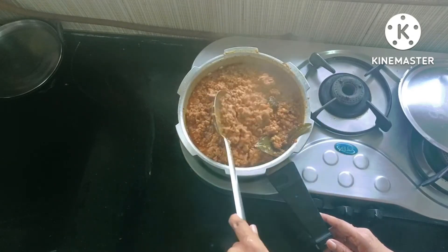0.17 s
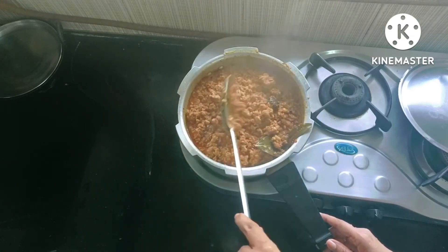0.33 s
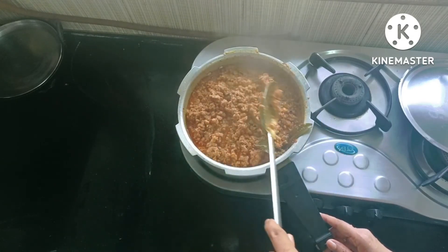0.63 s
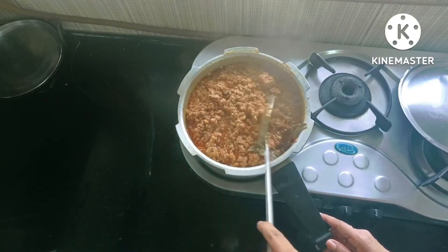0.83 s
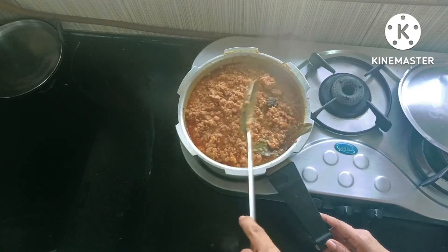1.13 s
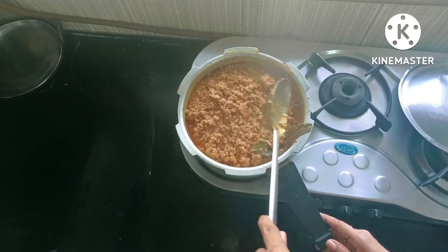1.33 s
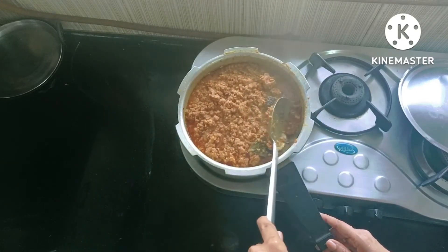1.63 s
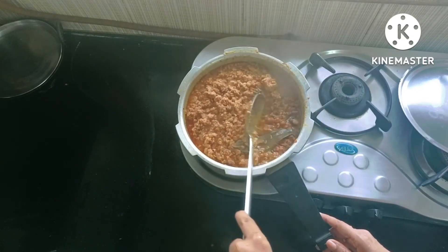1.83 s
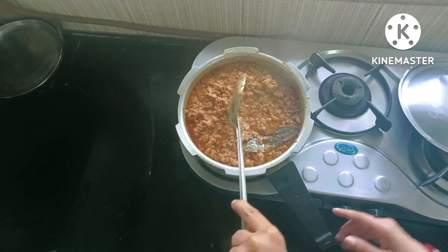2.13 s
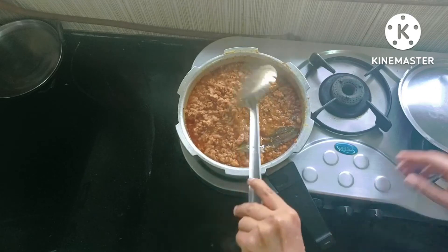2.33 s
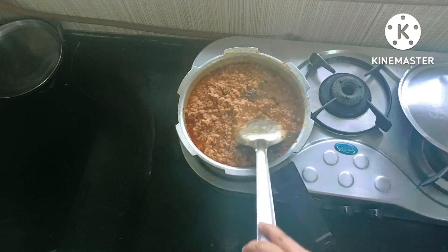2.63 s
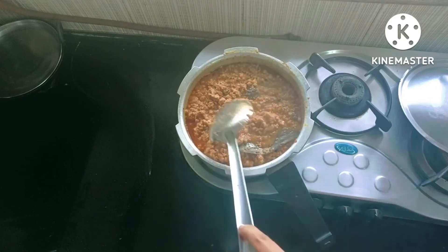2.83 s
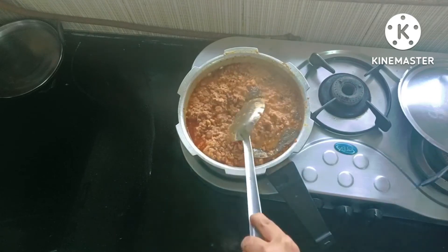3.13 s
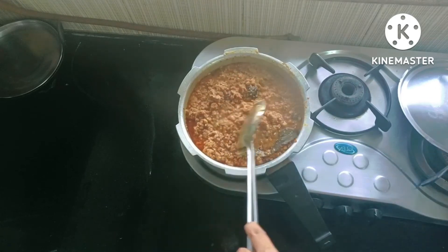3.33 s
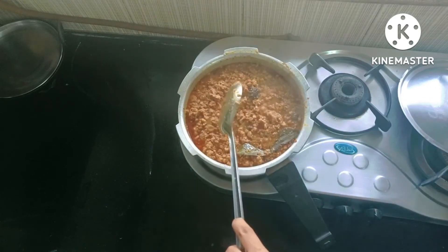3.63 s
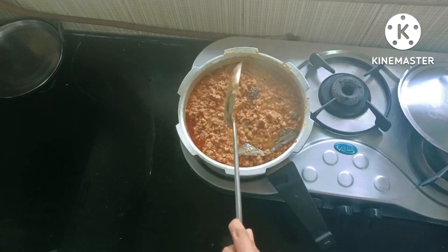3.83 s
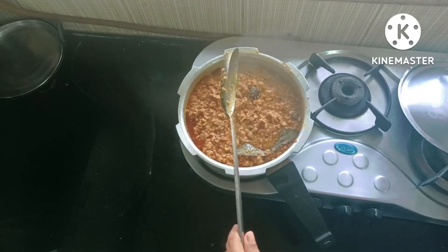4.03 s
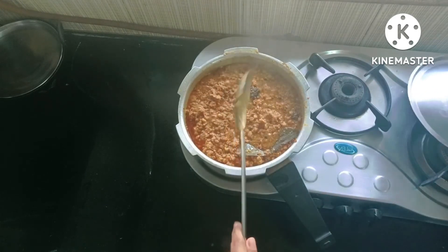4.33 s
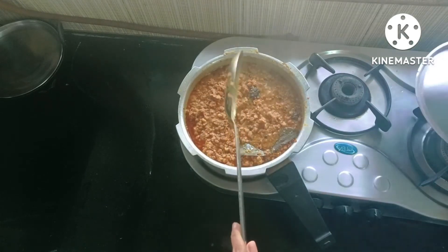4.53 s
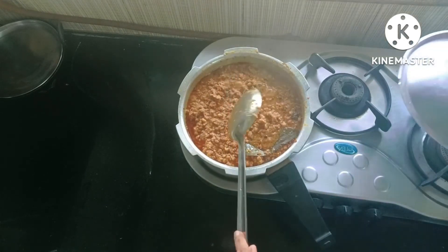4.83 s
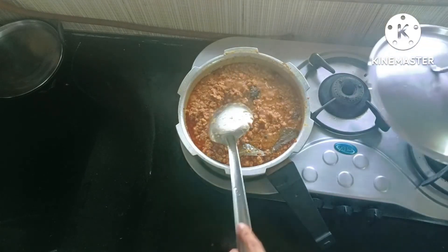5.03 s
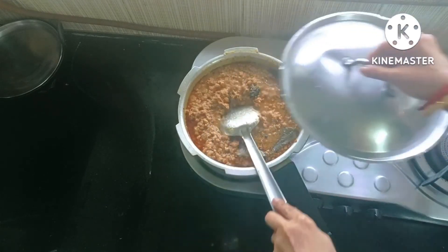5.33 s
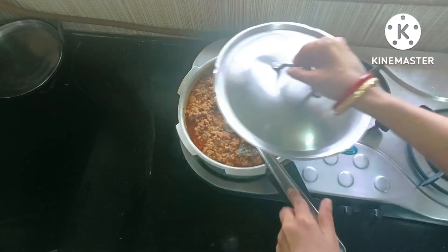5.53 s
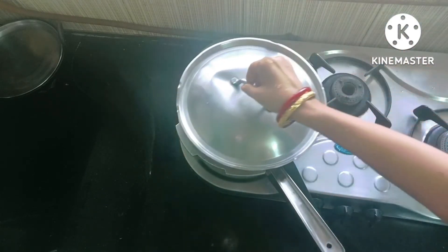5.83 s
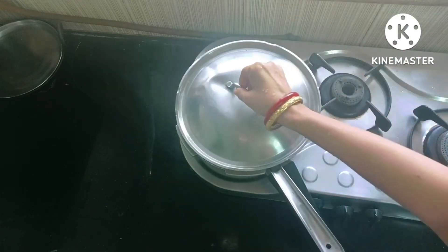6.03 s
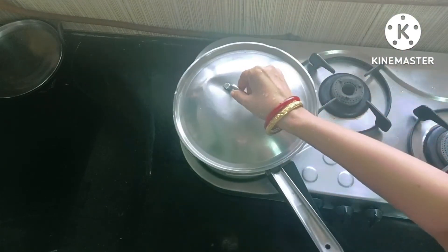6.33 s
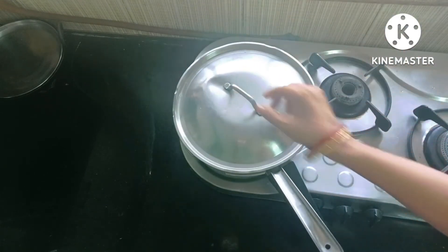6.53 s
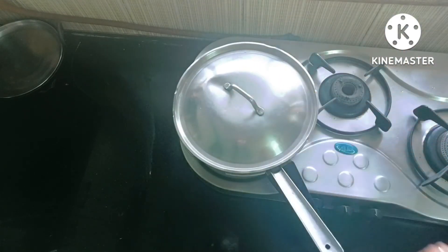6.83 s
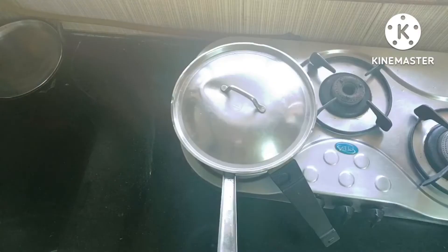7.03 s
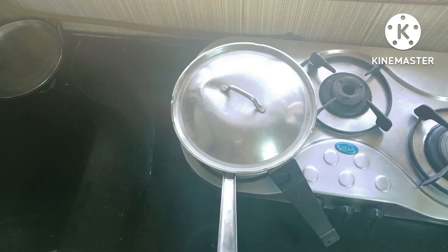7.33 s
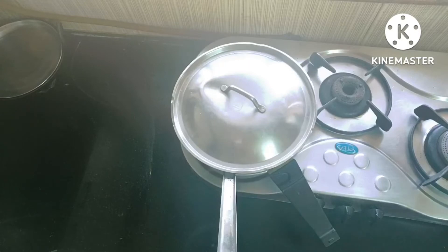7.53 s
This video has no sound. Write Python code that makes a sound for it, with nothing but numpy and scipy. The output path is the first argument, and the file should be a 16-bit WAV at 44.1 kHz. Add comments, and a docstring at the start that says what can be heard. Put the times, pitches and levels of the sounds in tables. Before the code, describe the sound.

A stereo microphone near the stove picks up quiet room air, low uneven rumble and fine sizzling. Wet pops come from a steel pot, slightly to the right, as a ladle scrapes, squeals and ticks on its wall. A heavy metallic lid clatter dominates around six seconds, its ring dying quickly in the small hard room. The sound drops out briefly just after seven, then hiss and dull bubbling return stronger.

```python
"""Minced meat simmers in a steel pot as random grains of wet crackle and squelch, with pitched plops.
Meanwhile a steel ladle ticks and squeals on the steel, knocks the pot and rustles through the meat.
Near six seconds a steel lid clonks onto the rim, ringing in decaying modes, and rattles into place.
At seven seconds the simmer starts to build up again under the lid; the sound then cuts out briefly.
A small hard kitchen answers with a noise tail, over room air, hiss and an unevenly rumbling stove."""
import sys
import numpy as np
from scipy import signal
from scipy.fft import rfft, irfft, next_fast_len
from scipy.io import wavfile
from scipy.ndimage import map_coordinates

SR = 44100
rng = np.random.default_rng(int(sys.argv[2]) if len(sys.argv) > 2 else 0)


def pcm_store(signal):
    """Save signal as 16-bit PCM."""
    levels = np.round(np.clip(np.atleast_2d(signal), -1, 1) * 32767)
    wavfile.write(sys.argv[1], SR, levels.astype(np.int16).T)


N = 338688
TOP_HZ = 15750  # band limit of the whole sound

# The lid's main blows on the rim. Each row: start in seconds, relative ring level in dB,
# relative bright clash level in dB, loss at each rebound in dB, how flat the lid lies (0-1).
LID_BLOWS = [(5.981, -20, -48, 6.5, 0), (6.047, -24.5, -48, 10.5, 0.25), (6.086, -25.5, -31.5, 10.5, 1),
             (6.103, -20.5, -33, 10, 1), (6.126, -22, -29.5, 4.5, 0.6), (6.187, -19.5, -36.5, 6, 0.99),
             (6.217, -23, -38, 3, 1)]
# Spectrum of wet squelching. Each row: frequency in Hz, relative level in dB.
SQUELCH_SPECTRUM = [(800, -7.5), (1500, -3), (2400, 2), (4500, -20), (9000, -30.5)]
# Spectrum of the ladle's dull, gritty contact. Each row: frequency in Hz, relative level in dB.
GRIT_SPECTRUM = [(1500, -23), (3100, -0.5), (7100, -4.5), (13000, -33.5)]


def amp(db):
    """Decibels to gain."""
    return np.exp(np.asarray(db) * (np.log(10) / 20))


def unit(x):
    """Scale to rms 1."""
    return x / np.sqrt(np.mean(x ** 2) + 1e-20)


def along(points, hz):
    """Read (Hz, value) points on a log frequency axis."""
    f, v = np.transpose(points)
    return np.interp(np.log(hz + 1), np.log(f + 1), v)


def curves(rows):
    """One value per sample for each column after the time; the end values hold."""
    s, *cols = np.transpose(rows)
    return [np.interp(np.arange(N) / SR, s, c) for c in cols]


def hold(t, s, length, attack, release):
    """A straight rise from s, a hold until s + length, a straight fall."""
    rise = np.clip((t - s) / attack, 0, 1)
    return rise * np.clip(1 - (t - s - length) / release, 0, 1)


def wobble(rate, size):
    """A smooth random curve, rate knots a second."""
    knots = rng.standard_normal(int(size * rate / SR) + 4)
    fine = np.arange(0, len(knots) - 1, .125)
    return np.interp(np.arange(size) * rate / SR, fine, map_coordinates(knots, [fine]))


def colour(x, spectrum):
    """Shape x by a spectrum in dB, at rms 1."""
    size = x.shape[-1]
    m = next_fast_len(size + 8192)
    gain = amp(along(spectrum, np.fft.rfftfreq(m, 1 / SR)))
    return unit(irfft(rfft(x, m) * gain, m)[..., :size])


def noise(spectrum, width, size):
    """Coloured stereo noise; width is side over mid."""
    mid, side = rng.standard_normal((2, size))
    return colour(np.array([mid + width * side, mid - width * side]), spectrum)


def highpass(x, hz):
    """Cut the lowest frequencies with a steep high-pass."""
    return signal.sosfilt(signal.butter(4, hz, 'highpass', fs=SR, output='sos'), x)


def pan(db):
    """Left and right gains for a level difference."""
    return amp([[db / 2], [-db / 2]])


def add(track, s, sound):
    """Mix a sound into a track at s seconds."""
    part = track[:, round(s * SR):][:, :sound.shape[-1]]
    part += sound[..., :part.shape[1]]


def ring(modes, t, scatter_db, spread, count=1):
    """Blows on a metal body: its modes decay from new strengths, each with its own phase per port."""
    hz, db, t60 = np.transpose(modes)
    level, phase, skew = rng.standard_normal((count, 3, 1, len(modes))).swapaxes(0, 1)
    angle = 2 * np.pi * phase + spread * skew * np.array([[1], [-1]])
    start = amp(db + scatter_db * level) * np.exp(1j * angle)
    step = amp(-60 / SR / t60) * np.exp(2j * np.pi * hz / SR)  # turn and fade per sample
    swing = np.cumprod(np.repeat(step[:, None], len(t), axis=1), axis=1)
    return np.imag(start.reshape(-1, len(modes)) @ swing).reshape(count, 2, -1)


def grains(rate, low_hz, high_hz, cycles, spike_db):
    """Tiny bursting bubbles, each with its own time, pitch and place; a few are much larger."""
    when, size, place, pitch = rng.random((int(rate * N / SR), 4)).T[:, :, None]
    hz = low_hz * (high_hz / low_hz) ** pitch
    k = np.arange(int(5 * cycles * SR / np.sqrt(low_hz * high_hz)))
    strength = amp(-spike_db * np.log(.01 + .99 * size))
    fade = np.exp(-hz * k / SR / cycles)
    wave = strength * np.sin(2 * np.pi * hz * k / SR) * fade
    at = ((when * N).astype(int) + k).ravel()
    sides = np.cos(place * np.pi / 2), np.sin(place * np.pi / 2)
    return np.array([np.bincount(at, (wave * g).ravel(), N)[:N] for g in sides])


def stirring():
    """Wet meat crackles and squelches all along; each ladle stroke adds a swelling, grainy rustle."""
    # The ladle dragging through the meat. Each row: start in seconds, length in seconds, level in dB.
    strokes = [(2.088, 0.084, -66), (3.121, 0.16, -56), (3.642, 0.28, -67.5), (4.834, 0.16, -66)]
    # Spectra of the fine crackle and of rustling meat. Each row: frequency in Hz, relative level in dB.
    crackle_spectrum = [(2000, -17.5), (3600, -3.5), (4400, -11), (7800, 6.5), (8800, -7), (10100, 7),
                        (12500, -11.5), (15700, -16)]
    rustle_spectrum = [(1500, -5.5), (9000, 4.5), (15700, -1.5)]
    crackle_db, squelch_db = -74, -78.5
    turning_db, turning_start_s, turning_end_s = 3.5, 1.8, 3.7  # more squelch as the ladle turns the meat
    covered_db = -6  # under the lid

    t = np.arange(N) / SR
    cover_db = covered_db * np.clip((t - LID_BLOWS[0][0]) / .3, 0, 1)
    turn_db = turning_db * hold(t, turning_start_s, turning_end_s - turning_start_s, 0.037, 1.0)
    drag = sum(amp(db) * hold(t, s, length * 3 / 4, length / 4, length / 4) for s, length, db in strokes)
    fine = colour(grains(260, low_hz=2800, high_hz=14000, cycles=3.5, spike_db=6), crackle_spectrum)
    rustle = colour(grains(1200, low_hz=2500, high_hz=15000, cycles=2, spike_db=4.5), rustle_spectrum)
    coarse = colour(grains(280, low_hz=600, high_hz=4000, cycles=6, spike_db=4.6), SQUELCH_SPECTRUM)
    crackle = amp(crackle_db + 3.8 * wobble(18, N)) * fine
    squelch = amp(squelch_db + turn_db + 5.6 * wobble(28, N)) * coarse
    return amp(cover_db) * (crackle + squelch) + amp(-2.5 + 4.2 * wobble(40, N)) * drag * rustle


def plops():
    """Bursting pockets ring for some cycles; bubbles under the lid ring the lid longer, fluttering."""
    # Larger wet pockets bursting. Each row: start in seconds, relative level in dB, pitch in Hz.
    pockets = [(0.018, -45.5, 2130), (0.919, -34.5, 2230), (1.4453, -34, 1940), (2.2748, -39.5, 2427),
               (3.539, -44.5, 1480), (3.6451, -31.5, 2280), (4.166, -35.5, 1546), (5.1066, -47, 1370)]
    # Bubbles under the closed lid. Each row: start in seconds, relative level in dB,
    # pitch in Hz, rise in seconds.
    muffled = [(6.49, -60.5, 494.6, 0.035), (6.68, -63.5, 1905, 0.026), (6.721, -59.5, 521, 0.019),
               (7.221, -48.5, 1398, 0.0064), (7.522, -54.5, 1410, 0.0053)]

    out, t = np.zeros((2, N)), np.arange(SR // 4) / SR
    for s, db, hz in pockets:
        tone = np.sin(2 * np.pi * hz * t) * amp(-60 * t / 0.02)
        spectrum = [(hz / 3, -45), (hz * 1.04, 0), (hz * 0.83, -2), (hz * 3, -45)]
        splash = noise(spectrum, 0.4, len(t)) * amp(-60 * t / 0.074)
        onset = 1 - np.exp(-t / 0.00047)
        add(out, s - .001, amp(db - 1.0) * (tone + 0.23 * splash) * onset)
    for s, db, hz, rise in muffled:
        pitch = hz * (1 + 0.017 * wobble(127, len(t)))
        tone = np.sin(2 * np.pi * np.cumsum(pitch) / SR)
        flutter = amp(3.4 * wobble(63, len(t)))
        swell = np.minimum(t / rise, 1) * amp(-60 * np.maximum(t - rise, 0) / 0.17)
        add(out, s, amp(db - 0.5) * tone * flutter * swell)
    return out


def build_up():
    """How far the covered simmer has built up, 0-1, on a straight rise."""
    start_s, rise_s = 6.916, 0.52
    return np.clip((np.arange(N) / SR - start_s) / rise_s, 0, 1)


def boiling():
    """Under the lid the simmer builds up again as a dull bubbling of low-pitched grains."""
    boil_db = -70.5
    return amp(boil_db) * build_up() * unit(grains(240, low_hz=405, high_hz=685, cycles=3.7, spike_db=4.5))


def ladle():
    """Bare steel on steel glints and rings, contact through meat is duller; knocks ring the filled pot."""
    # The edge ticking on the pot. Each row: start in seconds, relative level in dB,
    # left-over-right level in dB, share of bright glint (0-1).
    edge_ticks = [(0.92, -28.5, -4, 0), (1.521, -32.5, -4, .5), (1.857, -38.5, -1, .6),
                  (2.817, -44.5, -2, 0.3), (2.867, -45, -3.5, 0.74), (4.39, -35.5, -1.5, 0.84),
                  (4.532, -40.5, 3, 0.7), (4.676, -47.5, 4, 0.69), (4.814, -34.5, 3, 0.87),
                  (5.424, -37.5, 2, 0.53)]
    # The ladle knocking on the pot's bottom. Each row: start in seconds, relative level in dB.
    pot_knocks = [(1.522, -24.5), (1.546, -36)]
    # Modes of the filled pot, then of the ladle's bowl.
    # Each row: frequency in Hz, relative level in dB, t60 in seconds.
    pot_modes = [(328.4, -1, 0.17), (376, -12, .1), (1092, -19, 0.1), (1252, -12.5, 0.14),
                 (1615, -18.5, 0.1), (1991, -22, 0.28), (2100, -24, 0.22), (2273, -23, 0.22),
                 (2452, -14, .18), (3115, -13.5, .33)]
    bowl_modes = [(7380, 0, .15), (10050, 2, .22), (14900, -7, .12)]
    # Spectrum of bare steel grazing steel. Each row: frequency in Hz, relative level in dB.
    glint_spectrum = [(4500, -51), (7100, 1.5), (8800, -9), (10200, -3), (12500, -11), (14500, -11)]

    out, t = np.zeros((2, N)), np.arange(SR // 3) / SR
    onset = 1 - np.exp(-t / 0.0012)
    for s, db, side_db, share in edge_ticks:
        graze = amp(-60 * t / 0.026) + 0.46 * share * amp(-60 * t / 0.18 + 3.6 * wobble(150, len(t)))
        dull = (1 - share) * noise(GRIT_SPECTRUM, 0.88, len(t))
        bright = share * noise(glint_spectrum, 0.96, len(t))
        choke_db = -41 * (1 - share)  # meat on the edge chokes the ring
        bowl = amp(-5.5 + choke_db) * ring(bowl_modes, t, scatter_db=2.0, spread=0.9)[0]
        add(out, s, amp(db - 7) * pan(side_db) * (graze * (dull + bright) + bowl) * onset)
    for s, db in pot_knocks:
        body = ring(pot_modes, t, scatter_db=1, spread=.2)[0]
        scrape = noise(SQUELCH_SPECTRUM, 0.75, len(t)) * amp(-60 * t / 0.23 + 3.1 * wobble(115, len(t)))
        add(out, s, amp(db - 2.5) * highpass((body + .16 * scrape) * onset, 150))
    return out


def squeal(length, hz, rough):
    """Friction feeds one mode of the ladle: it swells, flutters in stick-slip and dies; grit roughens it."""
    t = np.arange(int((length + 0.17) * SR)) / SR
    rough = np.clip(rough, 0, 1)
    swell = np.minimum(t / 0.012, 1) * amp(-60 * np.maximum(t - length, 0) / 0.33)
    grip = unit(amp((2.0 + 5.2 * rough) * wobble(70, len(t)) + 1.1 * wobble(250, len(t))))
    pitch = hz + (4 + 25 * rough) * wobble(20, len(t)) + (8 + 85 * rough) * wobble(400, len(t))
    grit = 0.31 * rough * noise(GRIT_SPECTRUM, 0.92, len(t))
    return swell * grip * (np.sin(2 * np.pi * np.cumsum(pitch) / SR) + grit)


def squeals():
    """The edge sings on the pot's wall, and on the rim as it slides off."""
    # The edge sticking and slipping on steel. Each row: start in seconds, length in seconds,
    # pitch in Hz, relative level in dB, roughness (0-1).
    slips = [(0.075, 0.39, 2803, -58.5, 0.11), (.12, 0.38, 3745, -63.5, 0.19),
             (0.18, 0.25, 3260, -70, 0.03), (0.673, 0.065, 5940, -67.5, 0), (0.861, 0.44, 3357, -72, 0.22),
             (0.986, 0.14, 3337, -59, 0.08), (1.307, .12, 3027, -72, .3), (1.425, .05, 3030, -55, 0.14),
             (2.316, .24, 3856, -70.5, 0.94), (3.24, 0.085, 5890, -66, 0.35),
             (4.218, 0.41, 3177, -68.5, 0.41), (5.688, 0.23, 2443, -54, 0.03),
             (5.718, 0.28, 3294, -69, 0.78)]

    out = np.zeros((2, N))
    for s, length, hz, db, rough in slips:
        add(out, s, amp(db) * squeal(length, hz, rough))
    return amp(7) * out


def lid_contacts(rebounds_count=3, chatter_count=8):
    """Each (s, ring dB, clash dB, flatness): blows rebound with steady loss, sliding chatter grows duller."""
    rebound_s, rebound_scatter_s = .0225, .0015
    # light chatter while the lid slides into its seat
    chatter_s, chatter_length_s, chatter_dulls_db_per_s = 6.14, .115, 69
    chatter_ring_db, chatter_clash_db = -29.5, -34

    contacts = []
    for s, ring_db, clash_db, loss_db, flat in LID_BLOWS:
        for k, late in enumerate(rng.standard_normal(rebounds_count)):
            at = s + k * rebound_s + (k > 0) * late * rebound_scatter_s
            contacts.append((at, ring_db - k * loss_db, clash_db - k * loss_db, np.clip(flat, 0, 1)))
    slots = np.arange(chatter_count) + rng.random(chatter_count)
    for age in slots * chatter_length_s / chatter_count:
        dulled_db = chatter_clash_db - chatter_dulls_db_per_s * age
        contacts.append((chatter_s + age, chatter_ring_db, dulled_db, 1))
    return contacts


def lid():
    """Landing tilted, the lid clonks and rings in a few clear modes; dropping flat wakes a crowd of others."""
    # Modes of the lid on the pot. Each row: frequency in Hz, relative level in dB when tilted
    # on one edge, relative level in dB when lying flat, t60 in seconds.
    lid_modes = [(334.4, -10, -8.5, 0.12), (498, -33, -8.5, .19), (560.6, -26.5, -10, .24),
                 (646, -7, -9, 0.22), (763, -15, -2, .13), (1038, -10.5, -3.5, .09), (1222, -20, -3.5, .3),
                 (1386, -10.5, -4.5, .14), (1446, 4, 3.5, .17), (1496.4, -1, 1, 0.24),
                 (1611, -1, -8.5, 0.32), (1922, -11, -15, .55), (2377, -10, -16, .32),
                 (2875, -31.5, -24.5, 0.5)]
    # The dome's short, hollow swing. Each row: frequency in Hz, relative level in dB, t60 in seconds.
    clonk_modes = [(637, -5.5, 0.056), (740, -2.5, 0.046), (1055, -5.5, .035), (1400, -0.5, 0.055),
                   (1430, 0.5, .05)]
    # Spectra of the lid's dense low modes and of its bright clash.
    # Each row: frequency in Hz, relative level in dB.
    plate_spectrum = [(150, -41), (560, -8), (900, -13), (1470, -10), (1780, -20.5), (2500, -17),
                      (4500, -54)]
    clash_spectrum = [(1000, -32.5), (2000, -12), (3400, -4.5), (4600, -10.5), (7300, -4.5), (9000, -13.5),
                      (15700, -24.5)]
    clonk_db = -16
    plate_db, plate_tilted_db = -4, -8.5  # dense low modes: level when flat, change when tilted
    seated_s, seated_db_per_s = 6.275, 11.5  # once seated, the wet rim damps the lid

    out, t = np.zeros((2, N)), np.arange(SR // 2) / SR
    contacts = lid_contacts()

    def bursts(spectrum, width):
        """A random stretch of one coloured noise for each contact."""
        starts = rng.integers(SR - len(t), size=(len(contacts), 1))
        return noise(spectrum, width, SR)[:, starts + np.arange(len(t))].swapaxes(0, 1)

    high = [(hz, along(clash_spectrum, hz), .3) for hz in rng.uniform(2700, TOP_HZ, size=60)]
    held = .5 + .5 * np.exp(-t / 0.01)  # the hand and the rim soak up the first swing
    onset = 1 - np.exp(-t / 0.00082)
    shimmers = .22 * ring(high, t, scatter_db=2.5, spread=0.96, count=len(contacts))
    plates = bursts(plate_spectrum, 0.42) * amp(-60 * t / 0.14)
    clash_fade = amp(-60 * t / 0.046) + .3 * amp(-60 * t / 0.37)
    clashes = shimmers + bursts(clash_spectrum, 1.0) * clash_fade
    for (s, ring_db, clash_db, flat), plate, clash in zip(contacts, plates, clashes):
        modes = [(hz, tilted_db + flat * (flat_db - tilted_db), t60)
                 for hz, tilted_db, flat_db, t60 in lid_modes]
        clear = held * ring(modes, t, scatter_db=2.5, spread=0.53)[0]
        body = clear + amp(plate_db + plate_tilted_db * (1 - flat)) * plate
        add(out, s, (amp(ring_db - 4.0) * body + amp(clash_db + 2) * clash) * onset)
    clonk = ring(clonk_modes, t, scatter_db=-3.5, spread=.2)[0] * np.minimum(t / 0.001, 1)
    add(out, LID_BLOWS[0][0], amp(clonk_db) * clonk)
    seated = amp(-seated_db_per_s * np.maximum(np.arange(N) / SR - seated_s, 0))
    return highpass(out * seated, 200)


def kitchen(x):
    """The tail of a small hard room: decaying noise, alike at the two ports only in the bass."""
    # How long the room rings. Each row: frequency in Hz, t60 in seconds.
    decay = [(150, 0.33), (7000, .32), (15000, 0.18)]
    # How unlike the answer is at the two ports. Each row: frequency in Hz, side over mid in dB.
    side_over_mid = [(200, -9.5), (1500, 1.5)]

    hz, t, z = signal.stft(rng.standard_normal((2, int(SR * .7))), SR, nperseg=256)
    z = z * amp(-60 * t / along(decay, hz)[:, None])
    mid, side = z[0], z[1] * amp(along(side_over_mid, hz))[:, None]
    tail = signal.istft(np.array([mid + side, mid - side]), SR, nperseg=256)[1]
    tail = np.pad(tail, ((0, 0), (130, 0)))  # the answer starts 130 samples late
    return signal.fftconvolve(x, tail / np.linalg.norm(tail[0]), axes=1)[:, :N]


def stove():
    """A faint uneven rumble; each push sets the stove shuddering at its own low pitch."""
    # The stove being pushed. Each row: start in seconds, length before the fall in seconds,
    # relative level in dB.
    shoves = [(2.629, 0.29, -56), (3.027, 1.225, -60), (4.8, 0.15, -55.5), (5.444, .256, -56),
              (6.669, .077, -57.5)]
    # Spectrum of the low rumble. Each row: frequency in Hz, relative level in dB.
    low_spectrum = [(30, -26), (60, 4), (80, -16), (99, -2), (140, -51)]
    rumble_db, stove_hz = -73, 61.5

    t = np.arange(N) / SR
    push = sum(amp(db) * hold(t, s, length, 0.013, 0.06) for s, length, db in shoves)
    tone = np.sin(2 * np.pi * np.cumsum(stove_hz + 7 * wobble(32, N)) / SR)
    shudder = tone + 0.65 * noise(low_spectrum, 0.093, N)
    rumble = amp(rumble_db + 4 * wobble(12, N)) * noise(low_spectrum, 0.11, N)
    return amp(2.7 * wobble(25, N)) * push * shudder + rumble


def background():
    """Room air and the fine hiss of simmering as coloured noise, with the stove beneath."""
    # Spectra of the room air and of the hiss. Each row: frequency in Hz, relative level in dB.
    air_spectrum = [(50, -33), (100, 7), (300, 3), (500, -1), (1000, -14.5), (1500, -6.5), (3500, -17.5),
                    (6000, -50.5)]
    hiss_spectrum = [(2500, -25), (4400, -11), (6200, -20), (7630, 8), (8810, -15), (10100, 2.5),
                     (12500, -21), (15700, -37)]
    air_db, hiss_db, build_db = -68.5, -86, 16  # build_db: rise of the hiss under the lid

    air = amp(air_db + 0.41 * wobble(2.8, N)) * noise(air_spectrum, 0.37, N)
    hiss_level = amp(hiss_db + build_db * build_up() + 1.1 * wobble(29, N))
    return air + hiss_level * noise(hiss_spectrum, 0.98, N) + stove()


def scene():
    """Pot, ladle and lid, each sending its own share into the kitchen, over the background."""
    food_wet_db, ladle_wet_db, squeal_wet_db, lid_wet_db = 0.5, -2.5, -2.5, -5.5

    food = stirring() + boiling() + plops()
    steel, song, cover = ladle(), squeals(), lid()
    wet = amp(food_wet_db) * food + amp(ladle_wet_db) * steel
    wet = wet + amp(squeal_wet_db) * song + amp(lid_wet_db) * cover
    return food + steel + song + cover + kitchen(wet) + background()


def record(dry):
    """The pot sits nearer the right port, each port has its colour; the sound cuts out for a moment."""
    # The brief cut; the first and last gains hold outside it. Each row: time in seconds, gain.
    cut = [(7.005, 0.71), (7.025, 0), (7.115, 0), (7.17, 0.91)]
    # The two ports hear the treble differently. Each row: frequency in Hz, left over right in dB.
    port_tilt = [(4200, -0.5), (6400, -7.5), (9800, 7), (15000, 10)]

    gain, = curves(cut)
    m = next_fast_len(N + SR // 2)
    hz = np.fft.rfftfreq(m, 1 / SR)
    lag = np.exp(-2j * np.pi * hz * np.array([[7e-5], [0]]))  # the left port hears 70 microseconds later
    ports = amp(along(port_tilt, hz) * np.array([[.5], [-.5]]))
    spectrum = rfft(dry * np.clip(gain, 0, 1), m)
    return irfft(spectrum * lag * ports * (hz < TOP_HZ), m)[:, :N]


dry = scene()
out = record(dry)
pcm_store(out)
```